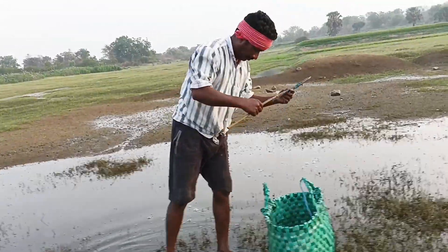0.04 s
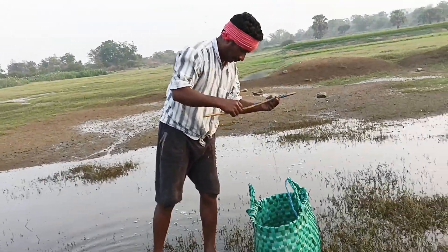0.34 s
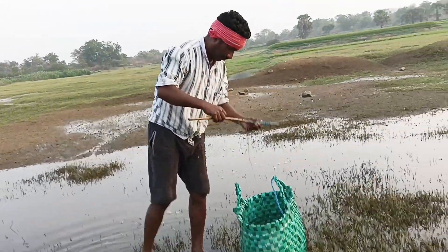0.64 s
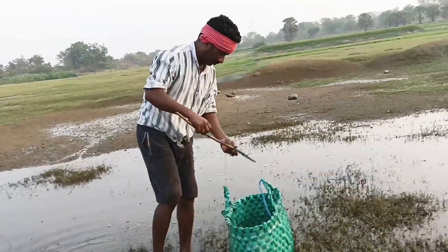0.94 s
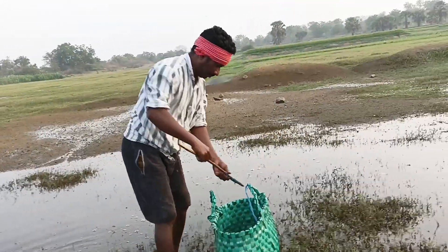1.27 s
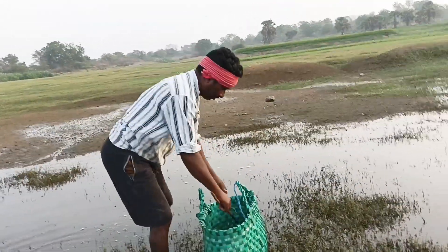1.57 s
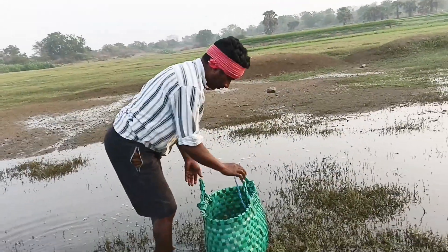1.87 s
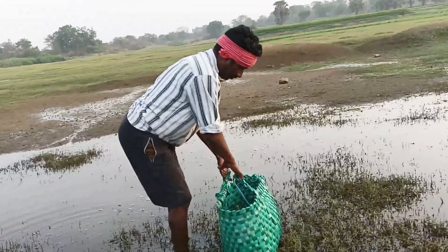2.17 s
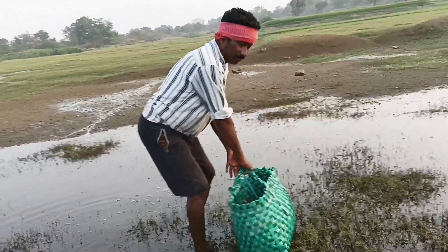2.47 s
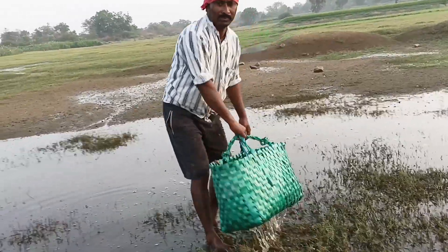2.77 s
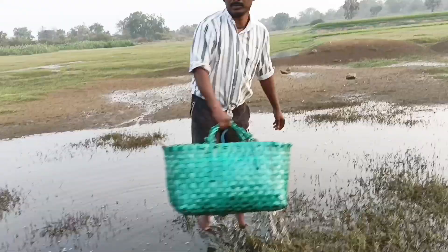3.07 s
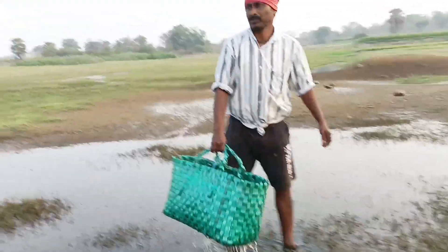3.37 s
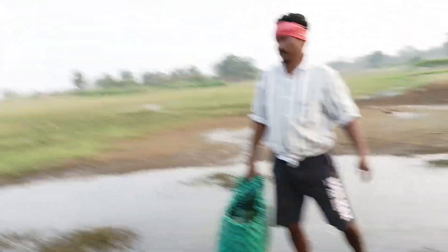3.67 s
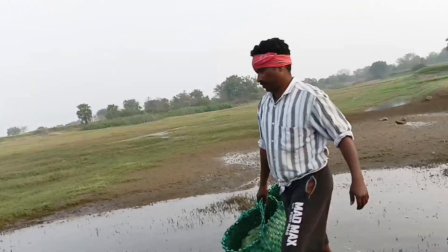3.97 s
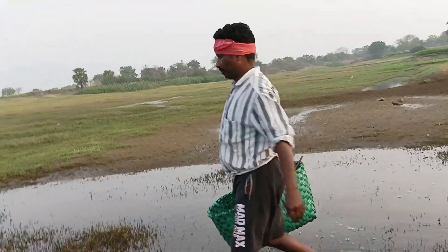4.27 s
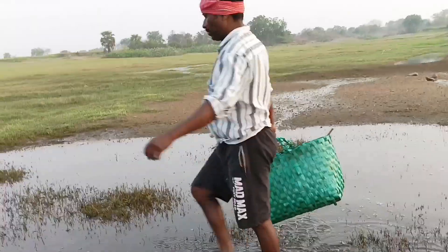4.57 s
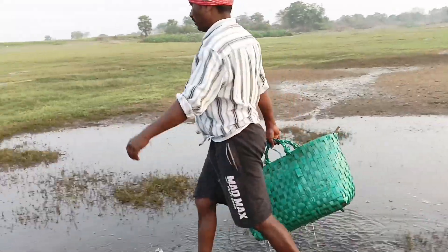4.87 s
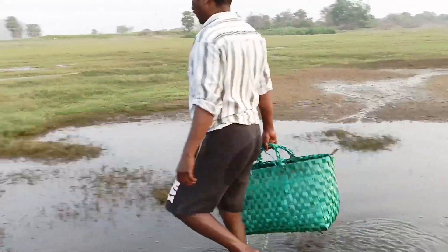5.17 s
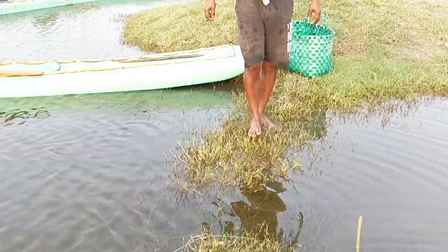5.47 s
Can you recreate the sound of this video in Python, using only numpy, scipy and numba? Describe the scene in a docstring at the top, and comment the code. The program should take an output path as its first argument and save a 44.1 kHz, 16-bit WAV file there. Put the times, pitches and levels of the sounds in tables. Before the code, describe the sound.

The place is a quiet open field by a shallow pond, with faint air rumble and distant small birds chirping, clearest around 2 seconds, along with a very faint dove. Fingers bump the hand-held microphone with soft low thumps, first at 0.2 seconds, then now and again, most strongly near 4.3. Around 1 second, feet shift in the water with small plops. At 1.8 seconds a knife drops into a woven plastic basket, giving a sharp rattling knock and a quick bounce. From 2.5 seconds the water sloshes as the basket is lifted, and drips and trickles patter onto the surface. From about 3.7 seconds bare feet wade close by, with bubbling gulps, slaps and hissing spray, loudest between 4 and 5.4 seconds. At 5.5 seconds the sound fades out for a moment, then returns quietly with a faint chirp.

```python
"""Small birds call far off and fingers bump a hand-held microphone as a man shifts, ankle-deep in a pond.
He drops a knife into a woven plastic basket, whose damped modes ring and rattle. He lifts the basket
dripping and wades off: his feet trap air pockets, which ring as bubbles, and throw up hissing spray.
Near the end the sound fades out for a moment, and only the quiet field returns."""
import sys
import numpy as np
from scipy import signal
from scipy.fft import rfft, irfft
from scipy.io import wavfile
from scipy.ndimage import uniform_filter1d
from numba import njit

SR = 44100
rng = np.random.default_rng(int(sys.argv[2]) if len(sys.argv) > 2 else 0)


def digitize_waveform(pressure):
    """Quantize a signal to 16-bit integers and store it at the path in sys.argv[1].

    Rows of a 2-D input are taken as channels; values are limited to [-1, 1].
    """
    field = np.atleast_2d(pressure).T
    bounded = np.clip(field, -1, 1)
    quanta = np.round(bounded * 32767).astype(np.int16)
    wavfile.write(sys.argv[1], SR, quanta)


N = 252252
TIME = np.arange(N) / SR

# A foot or the basket shoves water aside. Each row: start in seconds, hold in seconds,
# drive of the bubbles in dB, drive of the deep gulps in dB above that.
SLOSHES = [(0.848, 0.012, -56.5, -16), (1.195, 0.017, -56, -27), (2.62, 0.081, -54.5, 10),
           (2.732, 0.056, -63, 4), (2.906, 0.19, -55, -40), (3.003, 0.14, -48.5, -36),
           (3.32, 0.032, -68, 4), (3.715, 0.03, -44.5, -8.5), (3.766, 0.051, -53.5, 14.5),
           (3.844, 0.048, -49.5, -8), (4.016, 0.042, -54, 13), (4.112, 0.02, -41.5, 5.5),
           (4.192, 0.068, -39, -2), (4.308, 0.022, -41, 14), (4.398, 0.039, -36.5, 15.5),
           (4.485, 0.088, -44.5, -6.5), (4.602, 0.13, -51.5, 3.5), (4.838, 0.05, -41, -7),
           (4.916, 0.016, -57, 16), (5.075, 0.09, -43, 6), (5.174, 0.081, -46.5, 10.5),
           (5.273, 0.08, -47.5, 9), (5.411, 0.038, -40, 1)]
# Kicked-up water rains back. Each row: start in seconds, hold in seconds,
# drive of the droplets in dB, drive of the spray in dB above that.
SHOWERS = [(0.965, 0.03, -66, -4), (1.086, 0.025, -56, -9.5), (1.15, 0.093, -67, -25),
           (4.03, 0.051, -48, -8), (4.279, 0.027, -39, -16.5), (4.5, 0.014, -44.5, -11),
           (4.654, 0.067, -38, -14), (4.85, 0.075, -50.5, -9.5), (5.014, 0.027, -45, -15.5),
           (5.138, 0.12, -51.5, -7.5), (5.304, 0.096, -47, -12), (5.386, 0.06, -41.5, -8.5)]
# Water runs out of the lifted basket. Each row: time in seconds, drive of the droplets in dB.
DRAIN = [(2.55, -79), (2.73, -71), (2.85, -68), (2.91, -55.5), (3.1, -52), (3.25, -51.5), (3.3, -46.5),
         (3.65, -48), (3.95, -51), (4.2, -50.5), (4.6, -53), (5.0, -51.5), (5.2, -58), (5.5, -50)]
# The largest air pockets. Each row: start in seconds, pitch in Hz, level in dB,
# 60 dB decay time in seconds, initial rise in octaves per second.
AIR_POCKETS = [(.854, 1525, -38, 0.024, -4), (.875, 1160, -37.5, .067, -0.5), (.895, 502, -41, .13, 17.5),
               (.932, 540, -45, .1, 12.5), (.965, 524, -42, 0.11, 17), (1.07, 1475, -43, .028, -7),
               (1.097, 3110, -48, .036, -10), (1.198, 888, -48.5, 0.12, 0.5), (1.234, 868, -44, 0.056, 11),
               (2.639, 677, -28.5, 0.022, 28), (2.898, 3680, -43, 0.027, -3.5),
               (3.0384, 1077, -30.5, 0.041, 14.5), (3.148, 1235, -37.5, 0.064, -2),
               (3.158, 794, -48, 0.21, 2.5), (3.2853, 990, -24.5, 0.012, 20), (3.337, 1140, -28, 0.027, 27),
               (3.342, 527, -42, 0.17, 13), (3.37, 829, -41, 0.16, 30.5), (3.4, 1180, -31.5, 0.031, 6),
               (3.552, 1740, -30, 0.019, 35), (3.6262, 2450, -30, 0.014, 4),
               (3.706, 1980, -29.5, 0.019, 12), (3.732, 2490, -25, 0.011, 1), (3.77, 1255, -27, 0.021, 2),
               (3.78, 640, -29, 0.028, 13), (3.812, 1165, -33.5, 0.051, 1.5),
               (3.884, 1780, -27.5, 0.021, -7), (3.926, 3700, -23, 0.0053, 2),
               (3.9336, 2470, -34, .012, -14), (4.321, 1280, -23.5, 0.022, -2),
               (4.506, 1265, -27, 0.02, -1), (5.026, 3220, -31.5, 0.016, -13), (4.0363, 840, -24, 0.029, 5),
               (4.051, 1160, -18.5, 0.022, 7), (4.092, 1240, -27, 0.021, 4), (4.134, 1050, -29, 0.037, 10),
               (4.232, 794, -23, 0.028, 8), (4.255, 1173, -18.5, 0.028, -7),
               (4.302, 762, -13.5, 0.062, -15), (4.404, 288, -21.5, 0.035, 8),
               (4.414, 688, -18.5, 0.028, -11), (4.419, 1134, -20, 0.065, 11), (4.441, 643, -24, 0.01, 4.5),
               (4.63, 2050, -8.5, 0.0031, -0.5), (4.644, 1120, -20.5, 0.018, -2),
               (4.669, 850, -24.5, 0.044, -2), (4.797, 1730, -33, 0.05, -1),
               (4.804, 839, -28.5, 0.083, 4.5), (4.857, 780, -17, 0.021, 0.5),
               (4.859, 1144, -11.5, 0.019, 17.5), (5.1155, 725, -17.5, 0.039, -11),
               (5.151, 790, -29.5, 0.057, 14), (5.205, 1176, -29.5, 0.077, 6.5),
               (5.296, 1127, -20.5, 0.023, -11), (5.334, 1446, -22.5, 0.02, -5),
               (5.364, 777, -27, 0.051, 3.5), (5.456, 1300, -19.5, .014, 2)]
# Drops and soles hit the surface. Each row: start in seconds, crack level in dB, body level in dB.
SLAPS = [(0.9539, -38.5, -52), (1.1067, -40.5, -58), (1.432, -49.5, -72), (1.556, -51, -67.5),
         (2.5485, -37, -60.5), (2.78, -33.5, -56.5), (3.0788, -32, -53), (3.1865, -23.5, -40.5),
         (3.2866, -29, -41.5), (3.3387, -46, -40.5), (3.41, -28.5, -51), (3.6239, -54, -43),
         (3.9337, -30, -44.5), (4.084, -30, -44.5), (4.2335, -29, -35.5), (4.349, -29, -45.5),
         (4.644, -20, -33), (4.68, -23, -37.5), (4.71, -13.5, -29.5), (4.8536, -18.5, -41.5),
         (4.8566, -17, -28.5)]
# The knife lands and bounces. Each row: start in seconds, level in dB.
KNIFE_IMPACTS = [(1.7728, -19), (1.8029, -24), (1.858, -45)]
# Modes of the weave and the blade. Each row: frequency in Hz, level in dB, 60 dB decay time in seconds.
BASKET_MODES = [(270, -20.5, 0.25), (447, -9.5, 0.069), (596, -1.5, 0.042), (775, -4, 0.04),
                (1035, -0.5, 0.02), (1260, -4.5, 0.03), (1630, -20, 0.009)]
BLADE_MODES = [(2540, -15.5, 0.057), (3580, -11, .033)]
# Fingers press the microphone's case. Each row: centre in seconds, level in dB, pitch in Hz,
# width in seconds, port (0 left, 1 right).
FINGER_BUMPS = [(0.031, -47.5, 78, 0.035, 1), (0.094, -45, 79, 0.035, 0), (.202, -23, 103, 0.012, 1),
                (0.549, -48, 78, 0.071, 0), (0.652, -37, 78, 0.01, 0), (0.737, -31.5, 88, 0.019, 1),
                (0.884, -49, 76, .049, 0), (0.959, -39, 73, 0.0098, 0), (1.125, -40.5, 121, 0.025, 1),
                (1.451, -33.5, 109, 0.017, 1), (1.491, -31, 93.4, 0.016, 1), (1.62, -47.5, 70.2, 0.1, 0),
                (1.876, -43.5, 86.3, 0.055, 1), (2.531, -47, 92, .015, 0), (2.685, -52.5, 89, 0.1, 1),
                (2.803, -39, 75, 0.0094, 0), (3.234, -37, 72.5, 0.017, 1), (4.213, -33, 89, 0.011, 0),
                (4.247, -25.5, 209, 0.008, 0), (4.254, -12.5, 105, 0.0076, 0),
                (4.307, -27.5, 93.5, 0.049, 0), (4.352, -31.5, 163, 0.0095, 0),
                (4.385, -38.5, 86.5, 0.027, 0)]
# A far dove. Each row: start in seconds, length in seconds, level in dB.
DOVE_COOS = [(0.297, .13, -66.5), (0.597, 0.1, -67.5), (1.995, .19, -62), (2.3, 0.32, -64.5)]
# A nearer bird slurs down, then flicks up. Each row: start in seconds, level in dB.
TWO_PART_CALLS = [(1.885, -58.5), (2.051, -55)]
# Single whistles. Each row: start in seconds, length in seconds, middle pitch in Hz, level in dB,
# share of that pitch lost over each half of the note.
WHISTLES = [(0.102, .086, 4450, -71, .02), (1.529, 0.034, 5560, -67, 0.052),
            (1.709, .12, 4390, -55.5, 0.035), (1.967, 0.084, 2775, -63, -0.024),
            (2.126, 0.049, 1257, -64.5, -0.053), (2.175, 0.15, 2660, -76.5, 0.057),
            (2.199, 0.046, 4560, -70, .06), (2.36, 0.08, 4570, -66, -0.0014),
            (5.631, 0.077, 3954, -57.5, -0.031)]
# The spectrum of still air. Each row: frequency in Hz, relative level in dB.
AIR_SPECTRUM = [(25, -36), (50, 0.5), (95, -1), (200, -5), (380, -18), (750, -24), (2700, -28), (4400, -30),
                (6000, -40), (16000, -43)]
# Thin high hiss. Each row: centre in Hz, width in Hz, left level in dB, right level in dB.
HISS_BANDS = [(4200, 360, -99.5, -96.5), (8253, 420, -88, -71.5), (10230, 750, -79, -104)]
# The response of the microphone ports. Each row: frequency in Hz, gain in dB.
PORT_RESPONSE = [(300, -7.5), (3000, 2.5), (4400, 4.5), (5300, 3), (6700, -1), (8100, 5), (9100, -3.5),
                 (10300, 8.5), (11500, -2), (16000, 5.5)]
# The brief fade. Each row: time in seconds, gain in dB.
FADE = [(5.46, -0.5), (5.477, -11), (5.505, -66), (5.6, -17), (5.68, -5)]


def churn():
    """Bubble resonance: stirred water traps air, and the smaller the bubble, the higher it rings."""
    gulps, bubbles, droplets, spray = stirring()
    rush = heave(gulps)
    gulps = gulps / np.hypot(1, gulps / from_db(-29.5))   # a hard plunge adds few more small gulps
    large = from_db(-7) * swarm(170, 560, 1050, cycles=24, size_db=4, foam_db=-12)
    medium = from_db(-1.5) * swarm(400, 1120, 2100, cycles=26, size_db=4.5, foam_db=-11)
    small = from_db(-4.5) * swarm(900, 2000, 4600, cycles=34, size_db=5, foam_db=-10)
    sparkle = from_db(-3) * swarm(2000, 5500, 16000, cycles=12, size_db=5, foam_db=-15)
    fine = panned(2.1) * (from_db(-4.5) * spatter() + sparkle)
    return rush + gulps * large + bubbles * medium + droplets * small + spray * fine


def stirring():
    """Incoherent sources add in power: sloshes, showers and drainage set each bubble class's gain."""
    gulps = slosh = shower = mist = 0
    for s, hold_s, db, gulp_db in SLOSHES:
        gain = from_db(db) * surge(s, hold_s, attack_s=.02, decay_db_per_s=332.5)
        slosh, gulps = np.hypot(slosh, gain), np.hypot(gulps, gain * from_db(gulp_db))
    for s, hold_s, db, spray_db in SHOWERS:
        gain = from_db(db) * surge(s, hold_s, attack_s=.017, decay_db_per_s=370.5)
        shower, mist = np.hypot(shower, gain), np.hypot(mist, gain * from_db(spray_db))
    drain = drain_flow()
    bubbles = [slosh, from_db(-2) * shower, from_db(-14.5) * drain]
    droplets = [from_db(-9) * slosh, shower, drain]
    spray = [from_db(-26) * slosh, mist, from_db(-12) * drain]
    return gulps, *np.linalg.norm([bubbles, droplets, spray], axis=1)


def surge(s, hold_s, attack_s, decay_db_per_s):
    """Exponential decay: a splash builds linearly and dies away from hold_s after its start."""
    out, t = np.zeros(N), TIME[:SR // 2]
    add(out, s, np.minimum(t / attack_s, 1) * from_db(-decay_db_per_s * np.maximum(t - hold_s, 0)))
    return out


def drain_flow():
    """Amplitude envelope: the flow out of the basket sets the gain of its trickle."""
    return from_db(np.interp(TIME, *np.transpose(DRAIN), left=-140, right=-140))


def swarm(per_s, low_hz, high_hz, cycles, size_db, foam_db, even_s=.019):
    """A Poisson process: bubbles of one size class ring over foam noise, evened to a level near 1."""
    born = np.flatnonzero(rng.random(N) < per_s / SR)
    pitch, size, climb = rng.random((N, 3))[born].T
    place = rng.standard_normal((N, 2))[born]
    hz = low_hz * (high_hz / low_hz) ** pitch
    db = size_db * np.minimum(-np.log(size), 4)
    t60 = cycles * (.5 + climb) / hz
    rings = bubbles_in_stereo(born / SR, hz, db, t60, .3 * climb / t60, place, onset_cycles=1.0)
    foam = band(stereo_noise(.5), low_hz, high_hz, order=3)
    cloud = rms_one(rings) + from_db(foam_db) * rms_one(foam)
    power = np.mean(cloud ** 2, axis=0)
    for _ in range(2):
        power = uniform_filter1d(power, int(even_s * SR))
    return cloud / np.sqrt(np.abs(power) + 1e-6)


def bubbles_in_stereo(s, hz, db, t60, rise, place, onset_cycles, lag_s=.00003, spread_db=2.0):
    """Path difference: each bubble reaches the two ports with a delay and a level of its own."""
    delay, tilt_db = lag_s * place[:, 0], spread_db * place[:, 1]
    return np.array([ring_bubbles(s + side * delay, hz, from_db(db + side * tilt_db),
                                  t60, rise, onset_cycles) for side in (1, -1)])


@njit
def ring_bubbles(start, hz, height, t60, rise, onset_cycles):
    """A damped oscillator: each bubble swells within a few cycles and glides as it nears the surface."""
    out = np.zeros(N)
    for k in range(len(start)):
        for i in range(max(0, int(start[k] * SR) + 1), min(N, int((start[k] + t60[k]) * SR))):
            t = i / SR - start[k]
            cycles = hz[k] * t * (1 + np.log(2) / 2 * rise[k] * t)
            envelope = (1 - np.exp(-cycles / onset_cycles)) * np.exp(-np.log(1000) * t / t60[k])
            out[i] += height[k] * envelope * np.sin(2 * np.pi * cycles)
    return out


def heave(gulps, full_rush_db=-23):
    """A square law: the low rush of displaced water grows faster than the gulps, up to a hard plunge."""
    rush = rms_one(band(stereo_noise(.71), 220, 560, order=3))
    return from_db(-25.5) * gulps * np.minimum(gulps / from_db(full_rush_db), 1) * rush


def spatter(per_s=2900, size_db=6, mist_db=-3, even_s=.0067):
    """Shot noise: fine drops tick on the pond over a mist of hiss, evened to a level near 1."""
    hits = rng.random(N) < per_s / SR
    ticks = hits * from_db(size_db * np.minimum(rng.exponential(1, N), 4)) * rng.choice([-1, 1], N)
    ticks = rms_one(ticks * (1 + .94 * rng.standard_normal((2, N))))
    mist = from_db(mist_db) * rms_one(stereo_noise())
    hiss = band(ticks + mist, 3200, 12100)
    power = uniform_filter1d(np.mean(hiss ** 2, axis=0), int(even_s * SR))
    return hiss / np.sqrt(np.abs(power) + 1e-9)


def plops():
    """Bubble resonance: large air pockets, pinched off by feet and falling water, ring singly."""
    s, hz, db, t60, rise = np.array(AIR_POCKETS, float).T.copy()
    place = rng.standard_normal((len(s), 2))
    return bubbles_in_stereo(s, hz, db, t60, rise, place, onset_cycles=1.3, spread_db=2.04) * panned(3.6)


def slaps(crack_t60=.011, body_t60=.017, swell_s=.00066):
    """Impact noise: a crack as the surfaces close, with a short wet burst beneath it."""
    out, t = np.zeros((2, N)), TIME[:4096]
    for s, crack_db, body_db in SLAPS:
        stretch = np.clip(1 + (-43 - body_db) / 4, 1, 3.5)   # gentle contacts spread out in time
        noise = stereo_noise(size=len(t)) * (1 - np.exp(-t / (swell_s * stretch))) / np.sqrt(stretch)
        crack = band(noise * decay(t, crack_t60 * stretch), 5000, 11000) * from_db(crack_db - 8)
        body = band(noise * decay(t, body_t60 * stretch), 1300, 4400) * from_db(body_db + 12.5)
        add(out, s, crack * panned(8) + body)
    return out


def drips(rings_per_s=22, low_hz=1204, high_hz=3970, cycles=62, ticks_per_s=25, tick_t60=.008):
    """Air entrainment: some fat drips from the basket ring as rising bubbles, others only tick."""
    born = np.flatnonzero((rng.random(N) < rings_per_s / SR) & (TIME > DRAIN[0][0]))
    pitch, chance = rng.random(N)[born], rng.standard_normal((N, 3))[born]
    hz = low_hz * (high_hz / low_hz) ** pitch
    db = 13 + 7 * chance[:, 2]
    t60 = cycles / hz
    rings = bubbles_in_stereo(born / SR, hz, db, t60, .051 / t60, chance, onset_cycles=4.5)
    hits = (rng.random(N) < ticks_per_s / SR) * rng.random(N)
    bursts = signal.lfilter([1], [1, -decay(1 / SR, tick_t60)], hits + 1e-18)
    ticks = band(bursts * stereo_noise(), 4500, 15000)
    return drain_flow() * (rings + from_db(14) * panned(5.8) * ticks / 2)


def knife(brush_s=.024):
    """Modal vibration: the knife brushes the side, lands and bounces; weave and blade ring briefly."""
    out, t = np.zeros((2, N)), TIME[:8192]
    landing_s, landing_db = KNIFE_IMPACTS[0]
    for s, db in KNIFE_IMPACTS:
        modes = sum(from_db(level + rng.normal(0, 1)) * decay(t, t60) * np.sin(2 * np.pi * hz * t)
                    * rng.choice([-1, 1]) for hz, level, t60 in BASKET_MODES + BLADE_MODES)
        noise = stereo_noise(.18, len(t)) * (1 - np.exp(-t / .000052))
        rattle = from_db(-1.5) * band(noise * decay(t, t60=.029), 600, 3570, order=3)
        hardness = from_db(.47 * (db - landing_db))   # softer touches are duller
        crack = from_db(-12.5) * hardness * band(noise * decay(t, t60=.028), 2500, 14000) * panned(7)
        settle = from_db(-4.5) * band(noise * decay(t, t60=.14), 150, 920)
        add(out, s, from_db(db) * (from_db(-2.5) * modes + rattle + crack + settle))
    brush = rms_one(band(rng.standard_normal(len(t)), 600, 1400))[:int(brush_s * SR)]
    add(out, landing_s - brush_s, from_db(-47) * brush)
    return out


def handling(rub_db=-11, creak_db=-31):
    """Structure-borne sound: a press rocks the case near one port; skin friction grows with pressure."""
    out, t = np.zeros((2, N)), TIME[:SR // 4] - 1 / 8
    for s, db, hz, width_s, port in FINGER_BUMPS:
        swell = 1 / np.cosh(2.21 * t / width_s)
        rub = from_db(rub_db) * rms_one(band(rng.standard_normal(len(t)), 30, 124, order=3))
        creak = from_db(creak_db) * rms_one(band(rng.standard_normal(len(t)), 180, 240, order=3))
        rock = np.cos(2 * np.pi * (hz * t + rng.random()))
        press = from_db(db) * swell * (rock + rub + creak)
        add(out[int(port)], s + t[0], press[t + s >= 0])
    return out


def birds(coo_hz=582):
    """Frequency modulation: gliding tones form coos, calls and whistles, with steady peeps above."""
    out, falling = np.zeros((2, N)), np.array([1, 0, -1])

    def sing(s, length, pitches, db, pan_db):
        """A level difference gives one note its direction."""
        add(out, s, from_db(db) * panned(pan_db) * note(length, pitches, blur_hz=25 + .07 * pitches[1]))

    for s, length, db in DOVE_COOS:
        add(out, s, from_db(db) * note(length, coo_hz * np.array([.99, 1.008, .975]), blur_hz=100))
    for s, db in TWO_PART_CALLS:
        sing(s, .063, [4450, 4330, 3300], db, pan_db=7)
        sing(s + .057, .0332, [5250, 5940, 6600], db, pan_db=1.5)
    for s, length, hz, db, sag in WHISTLES:
        sing(s, length, hz * (1 + sag * falling), db, pan_db=4.5)
    for k in range(6):   # a run of down-slurred notes sinks in pitch as it swells
        sing(.253 + k * .089, .048, (2980 - k * 23.8) * (1 + .038 * falling), -77.5 + k * 1.5, pan_db=-9)
    for k in range(9):   # faint high peeps at an even pace
        sing(.21 + k * .287, .09, [7450] * 3, db=-82.5, pan_db=-17)
    return out


def chorus(notes=130, level_db=-81):
    """Superposition: many far birds twitter at random, mostly at the top of their range."""
    out = np.zeros((2, N))
    for when, pitch, length, slope, side in rng.random((notes, 5)):
        hz = 4650 - 2200 * pitch ** 2
        glide = 1 + .025 * (slope - .5) * np.array([1, 0, -1])
        twitter = note(.0057 + .15 * length, hz * glide, blur_hz=700)
        add(out, when * N / SR, from_db(level_db) * panned(10 * (side - .5)) * twitter)
    return out


def note(length, pitches, blur_hz):
    """Random modulation: a whistle gliding through three pitches blurs on its way through moving air."""
    progress = np.linspace(0, 1, int(length * SR))
    hz = np.polyval(np.polyfit([0, .5, 1], pitches, 2), progress)
    knots = rng.standard_normal((3, 128))
    real, imaginary, waver = [np.interp(progress * length * blur_hz, np.arange(128), k) for k in knots]
    flutter = .5 + .43 * (real + 1j * imaginary)
    phase = 2 * np.pi * np.cumsum(hz * (1 + .0087 * waver)) / SR
    return np.sin(np.pi * progress) ** 1.19 * np.real(flutter * np.exp(1j * phase))


def background(air_db=-70.5, waver_db=2.1):
    """Filtered noise: a faint rumble of open air and narrow bands of lightly fluttering high hiss."""
    air = rng.standard_normal((2, N)) + .91 * rng.standard_normal(N)
    out = from_db(air_db) * rms_one(colour(air, AIR_SPECTRUM))
    for hz, width, left_db, right_db in HISS_BANDS:
        flutter_db = waver_db * np.interp(TIME, np.linspace(0, N / SR, 150), rng.standard_normal(150))
        hiss = rms_one(band(rng.standard_normal((2, N)), hz - width / 2, hz + width / 2, order=3))
        out += from_db([[left_db], [right_db]]) * from_db(flutter_db) * hiss
    return out


def scatter(x, t60, wet_db):
    """Diffuse reflection: water and banks return a short tail, different at each port."""
    t = TIME[:SR // 2]
    tail = rng.standard_normal((2, len(t))) * decay(t, t60) * (t > .002)
    tail /= np.sqrt(np.sum(tail ** 2, axis=1, keepdims=True))
    return x + from_db(wet_db) * signal.fftconvolve(x, tail, axes=1)[:, :N]


def colour(x, points, size=8192):
    """Minimum-phase filtering through (Hz, dB) points."""
    hz, db = np.transpose(points)
    log_gain = np.log(from_db(np.interp(np.log(np.fft.rfftfreq(size, 1 / SR) + 1), np.log(hz), db)))
    cepstrum = irfft(log_gain)
    cepstrum[1:] *= 2
    response = irfft(np.exp(rfft(cepstrum[:size // 2], size)))
    return signal.fftconvolve(x, response[None], axes=1)[:, :N]


def band(x, low_hz, high_hz, order=2):
    """Causal band-pass filtering."""
    return signal.sosfilt(signal.butter(order, [low_hz, high_hz], "band", fs=SR, output="sos"), x + 1e-18)


def stereo_noise(apart=1, size=N):
    """Partial coherence: noise common to both ports plus a share of each port's own."""
    return rng.standard_normal(size) + apart * rng.standard_normal((2, size))


def decay(t, t60):
    """Exponential damping by 60 dB in t60 seconds."""
    return from_db(-60 * t / t60)


def add(out, s, sound):
    """Superposition of a short sound at s seconds."""
    start = max(0, round(s * SR))
    out[..., start:start + sound.shape[-1]] += sound[..., :max(0, N - start)]


def panned(db):
    """Stereo gains for a level difference, left over right."""
    return from_db(np.array([[db], [-db]]) / 2)


def from_db(db):
    """Amplitude ratio of a level."""
    return 10 ** (np.asarray(db) / 20)


def rms_one(x):
    """Normalisation to unit power."""
    return x / np.sqrt(np.mean(x ** 2) + 1e-20)


def scene():
    """Superposition: near water and knife, far birds, finger bumps and air meet at the two ports."""
    pond = churn() + drips() + plops() + slaps() + knife()
    left, right = colour(scatter(pond, t60=.07, wet_db=-9), PORT_RESPONSE)
    near = np.array([left, np.roll(right, 1)]) * panned(.66)   # the left port is nearer the water
    far = scatter(birds(), t60=.064, wet_db=-2.5) + scatter(chorus(), t60=.04, wet_db=4.5)
    return near + far + handling() + background()


def record(dry, low_hz=38, high_hz=16200):
    """Band limiting sheds the deepest rumble and the top; near the end the sound briefly fades out."""
    lean = signal.sosfilt(signal.butter(2, low_hz, "high", fs=SR, output="sos"), dry)
    faded = lean * from_db(np.interp(TIME, *np.transpose(FADE)))
    return signal.sosfilt(signal.ellip(12, .1, 80, high_hz, fs=SR, output="sos"), faded)


dry = scene()
out = record(dry)
digitize_waveform(out)
```